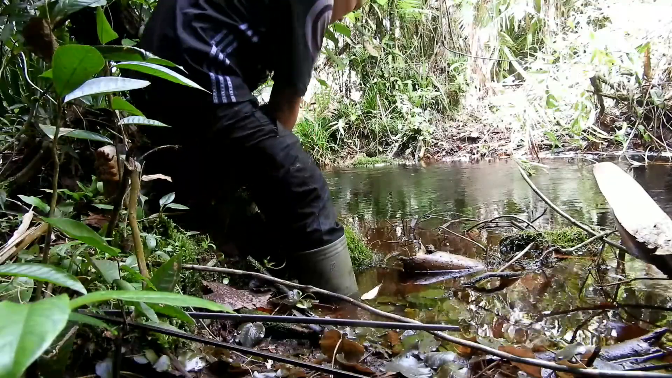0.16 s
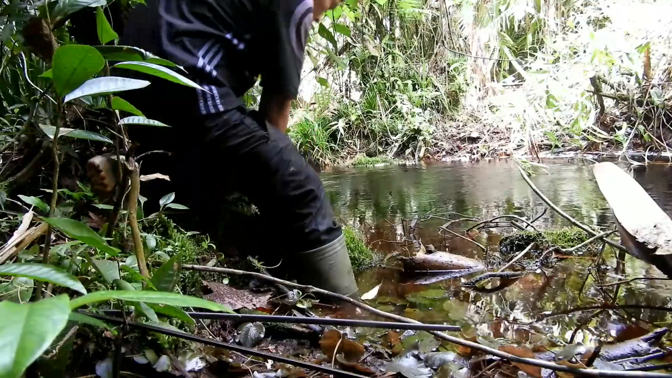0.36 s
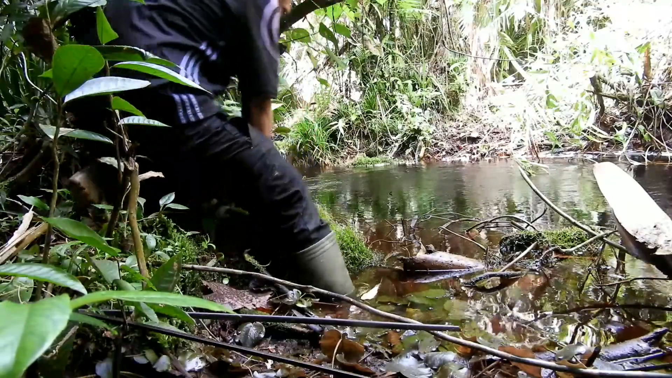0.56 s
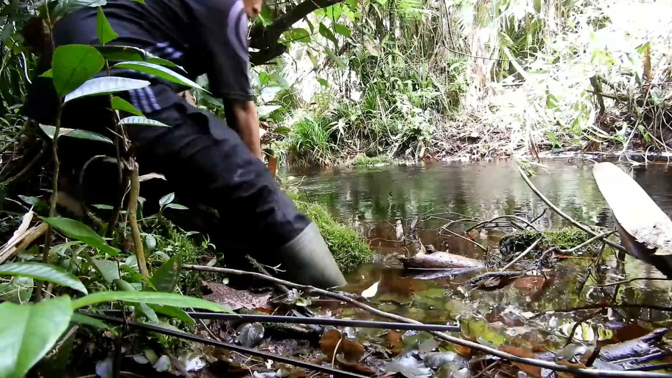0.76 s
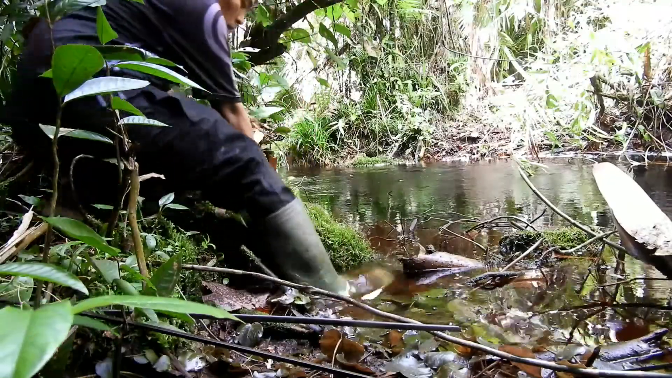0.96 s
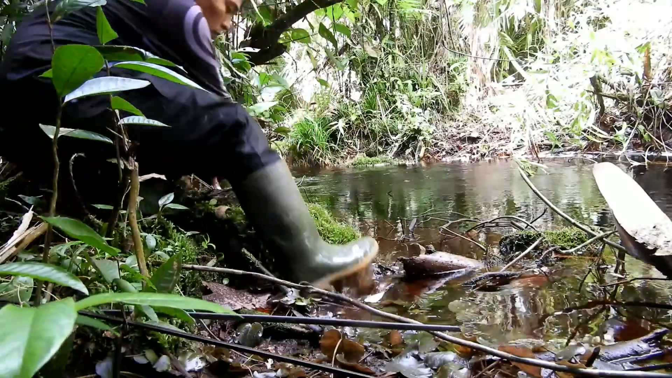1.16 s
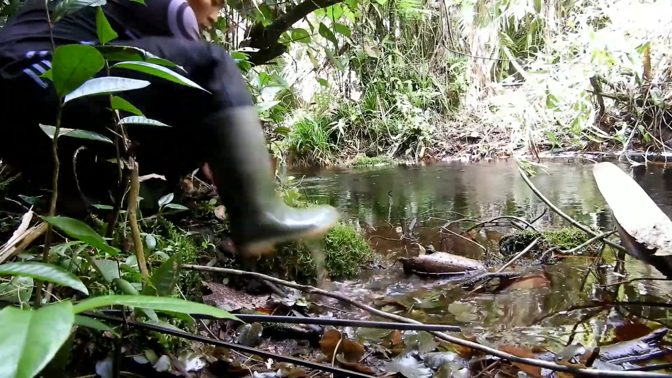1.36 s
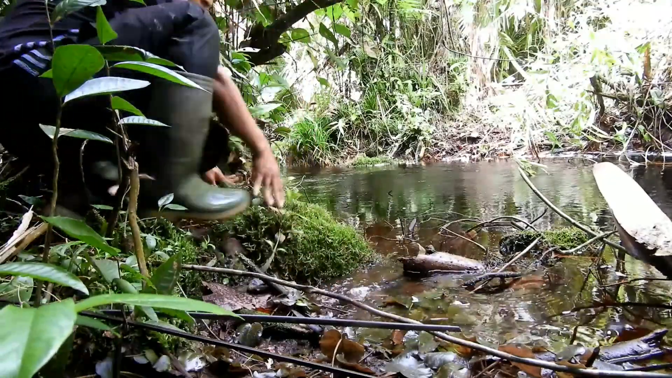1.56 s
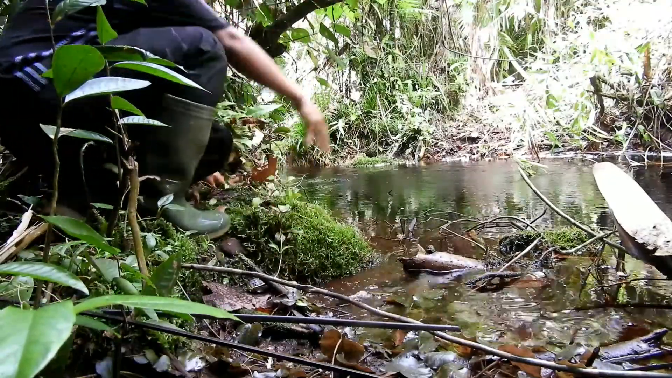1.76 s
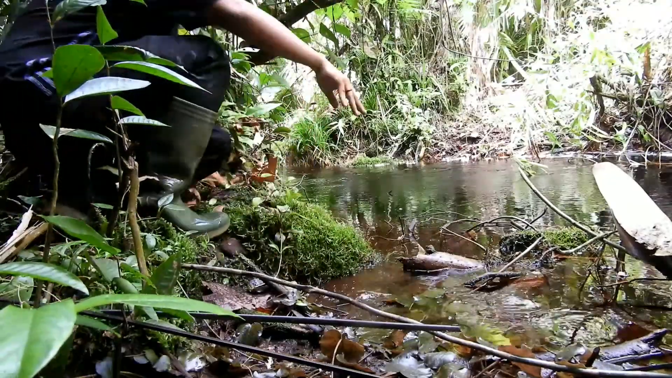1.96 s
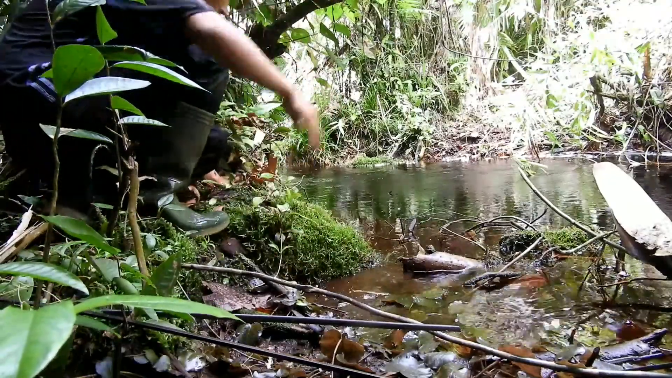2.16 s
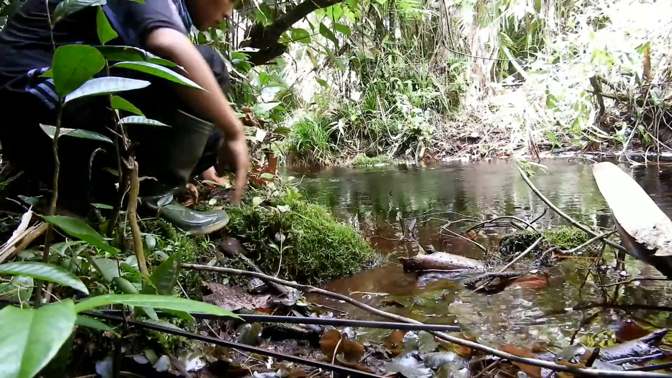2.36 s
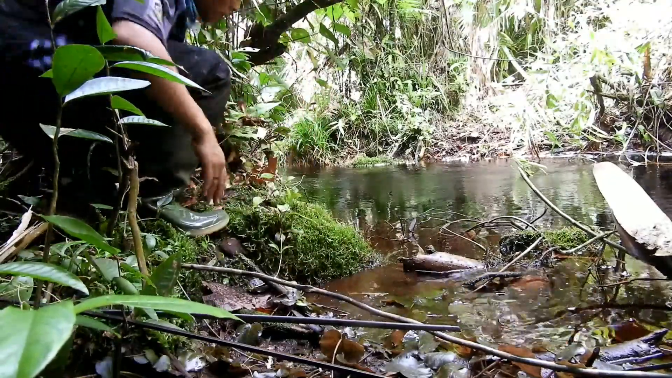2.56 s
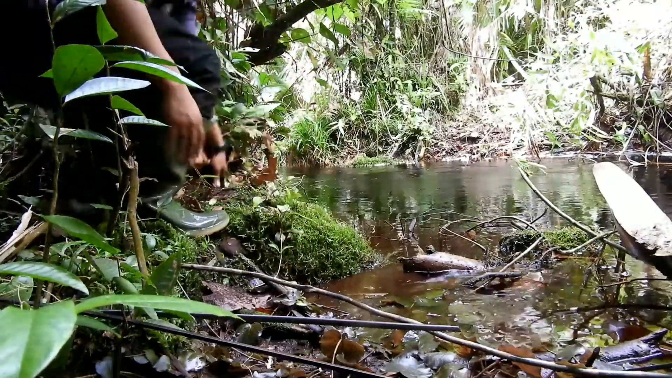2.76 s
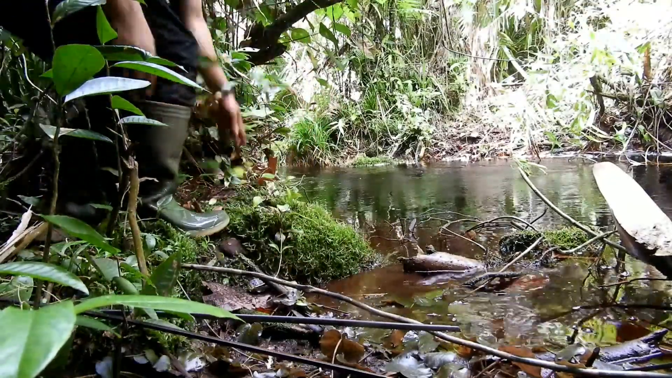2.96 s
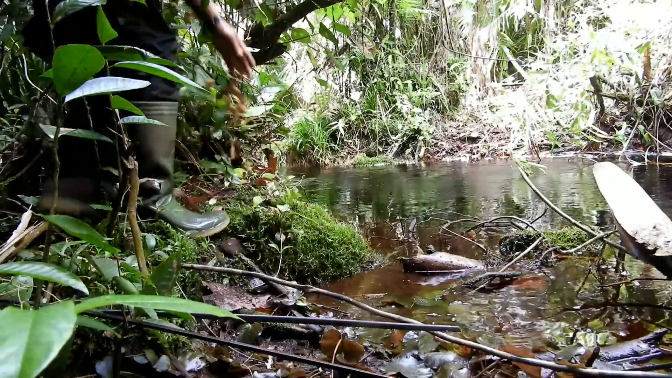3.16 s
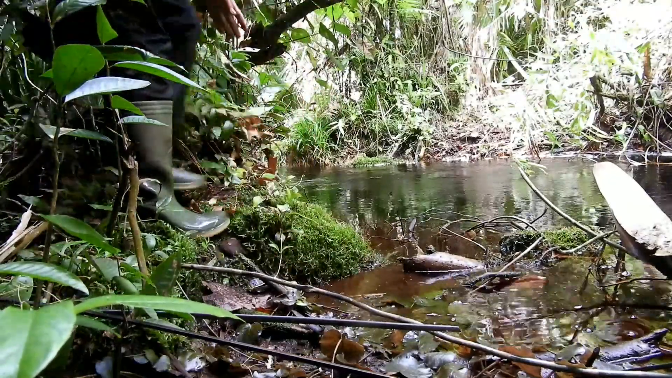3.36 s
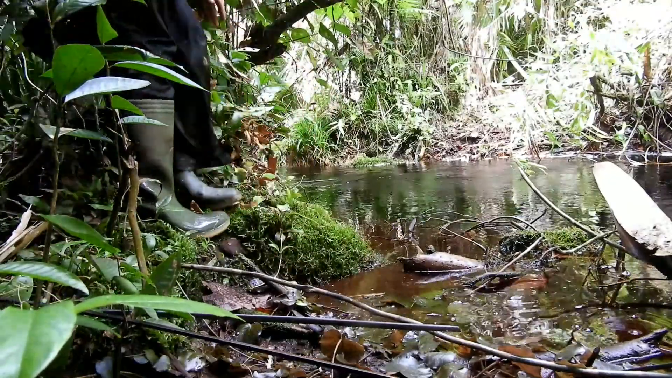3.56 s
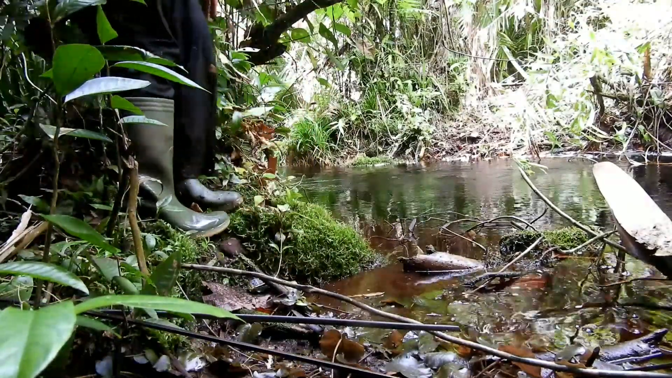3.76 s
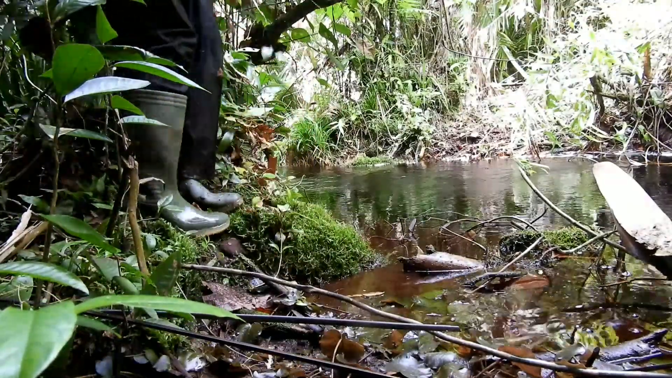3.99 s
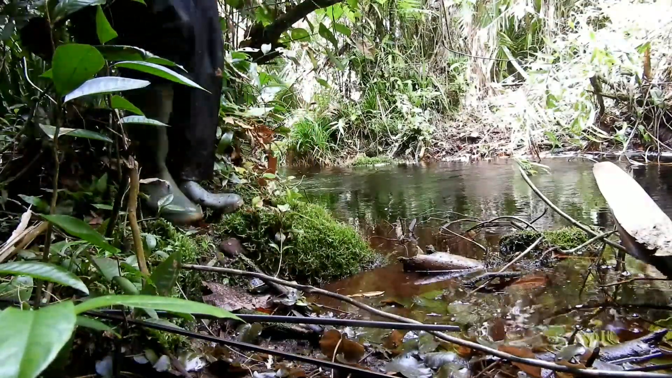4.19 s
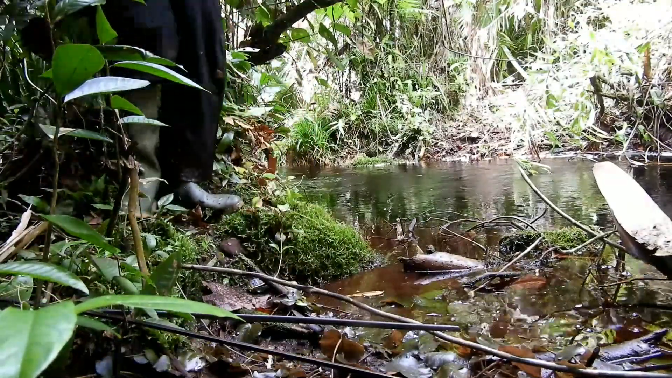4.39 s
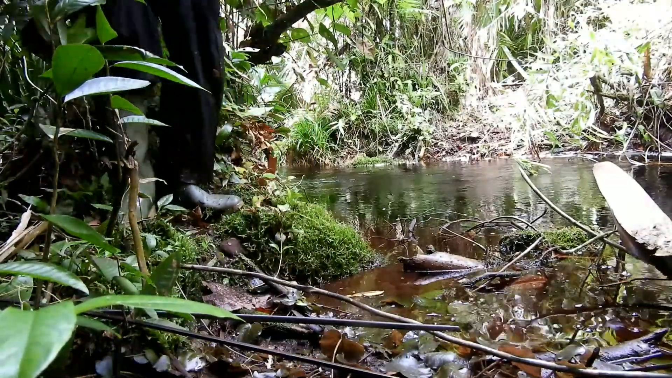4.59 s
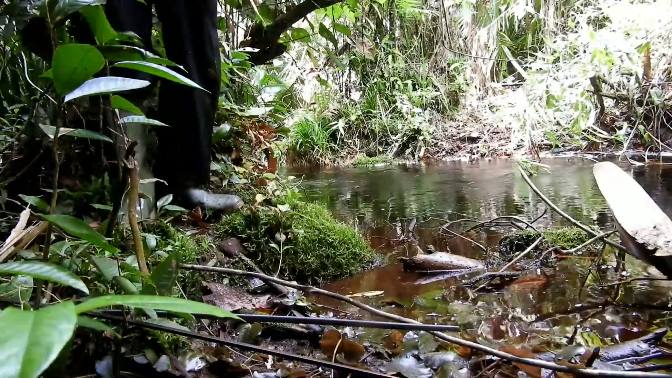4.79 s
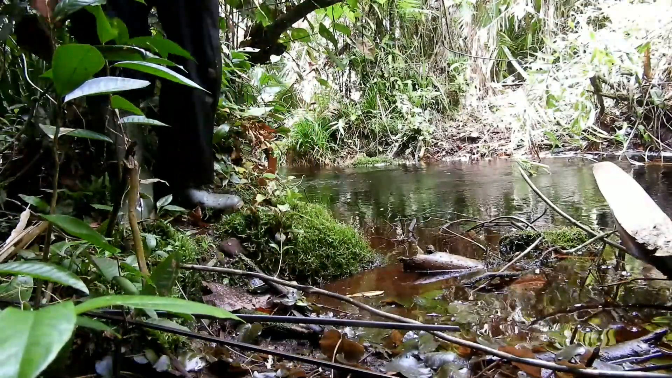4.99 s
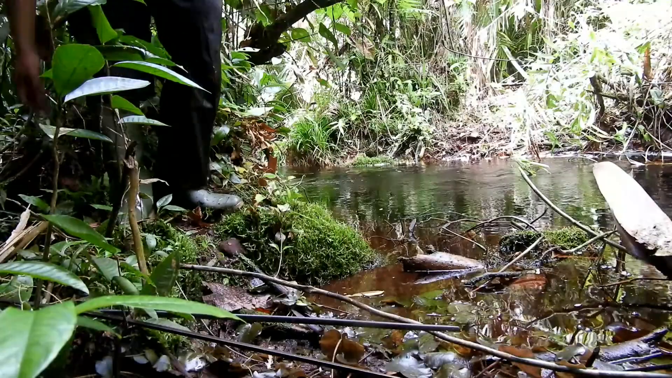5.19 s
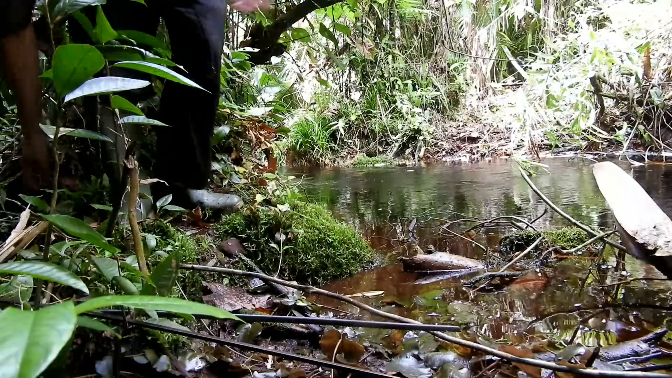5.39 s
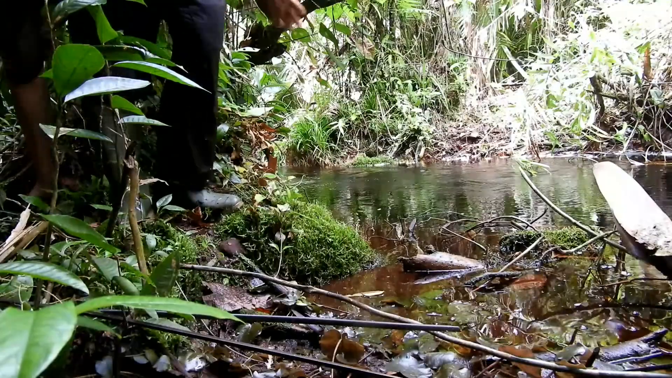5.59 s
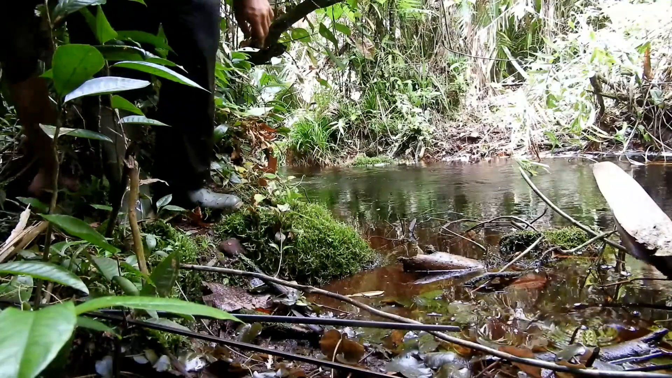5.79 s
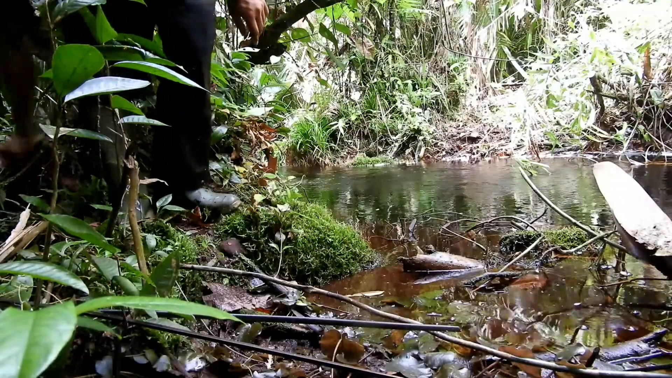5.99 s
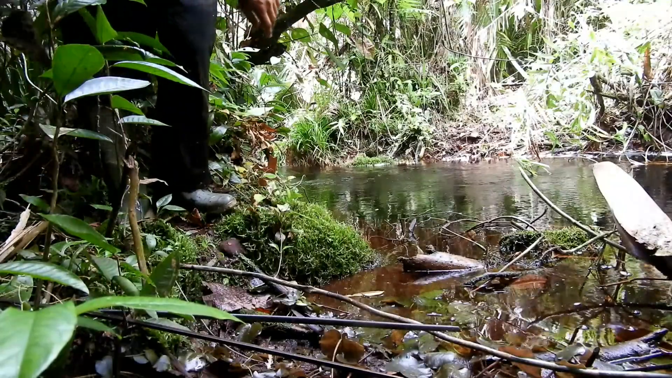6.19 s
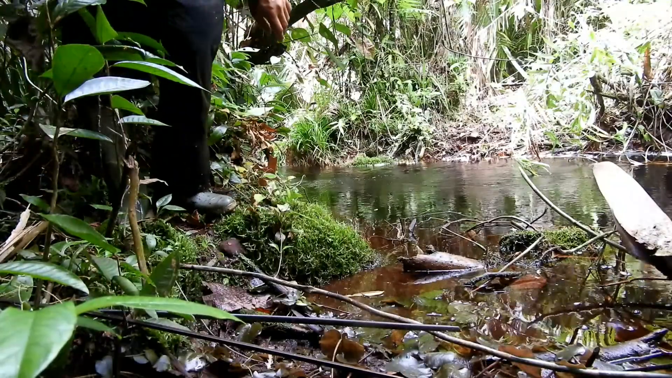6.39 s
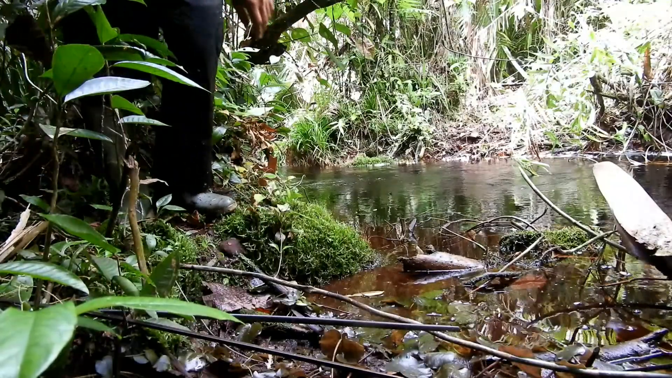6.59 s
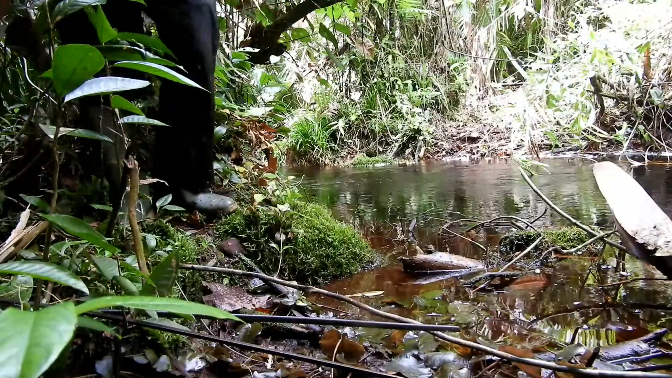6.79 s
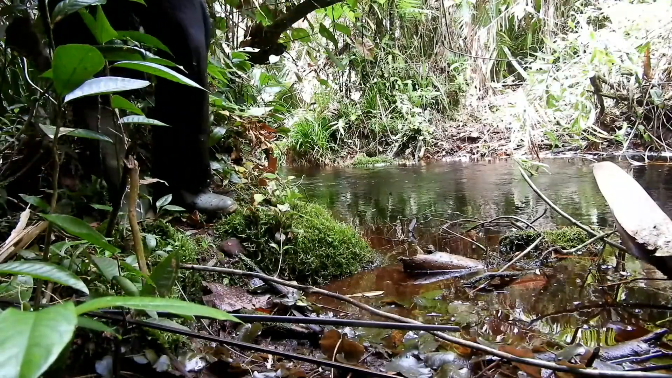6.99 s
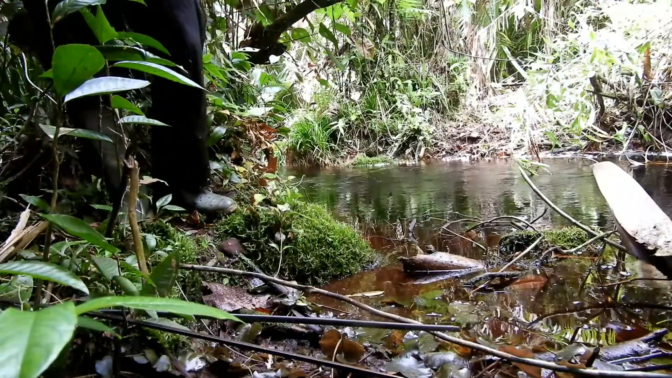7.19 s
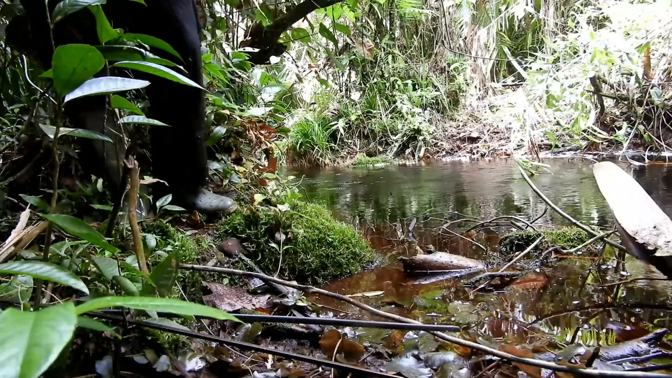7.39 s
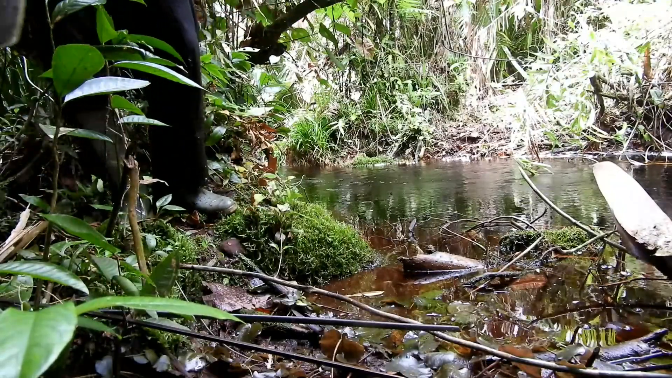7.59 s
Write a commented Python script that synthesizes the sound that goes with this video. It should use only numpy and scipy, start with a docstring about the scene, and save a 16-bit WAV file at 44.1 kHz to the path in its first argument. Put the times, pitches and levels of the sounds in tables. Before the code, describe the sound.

Close by a forest creek, leaves rustle as someone shifts, then a rubber boot breaks from muddy water with a sharp slosh, gulping bubbles and drips. Dull thuds on soft earth, twig snaps and crisp leaf brushing follow as they climb the bank. Later it calms, with one small metallic clink. Small birds chirp with echoes over soft air, creek wash and a thin insect whine. Natural stereo.

```python
"""A muddy forest creek: someone in rubber boots pulls a foot out and climbs the bank through leaves.
The water gulps and drips as air pockets ring with sliding pitch; twigs snap and dry leaves crack as noise bursts.
Soles thud as short dull notes, and something of steel, perhaps a bush knife, rings once in many tones.
Birds whistle among echoing trees, over a thin insect whine, steady air and creek wash, and a low distant hum."""
import sys
import numpy as np
from scipy import signal
from scipy.fft import rfft, irfft, next_fast_len
from scipy.io import wavfile
from scipy.ndimage import uniform_filter1d

SR = 44100
rng = np.random.default_rng(int(sys.argv[2]) if len(sys.argv) > 2 else 0)


def waveform_to_disk(signal):
    """Save audio, clipped to [-1, 1], as 16-bit WAV at the path in sys.argv[1]."""
    frames = np.transpose(np.atleast_2d(signal))
    scaled = np.clip(frames, -1, 1) * 32767
    samples = np.round(scaled).astype(np.int16)
    wavfile.write(sys.argv[1], SR, samples)


N = 337365
TIME = np.arange(N) / SR


def amp(db):
    """Turns decibels into a gain."""
    return 10 ** (np.asarray(db) / 20)


def unit(x):
    """Scales a sound to an average strength (rms) of 1."""
    return x / np.sqrt(np.mean(x ** 2) + 1e-20)


def read(points, hz):
    """Reads a curve between its points, on a logarithmic pitch axis."""
    f, value = np.transpose(points)
    return np.interp(np.log(hz + 1), np.log(f + 1), value)


def level(rows):
    """Turns a dB curve over time into a gain for every sample."""
    return amp(np.interp(TIME, *np.transpose(rows)))


def add(mix, s, sound):
    """Mixes a sound in at time s, cutting off what runs past the end."""
    part = mix[..., max(0, round(s * SR)):][..., :sound.shape[-1]]
    part += sound[..., :part.shape[-1]]


def swell(start, length, attack_s, release_s):
    """A loudness shape: a straight rise, a hold, then an exponential fade after the length."""
    rise = np.clip((TIME - start) / attack_s, 0, 1)
    fade = np.exp(-np.clip((TIME - start - length) / release_s, 0, 20))
    return rise * fade


def drift(rate_hz):
    """Random motion of rms 1, with little movement faster than rate_hz."""
    hz = np.fft.rfftfreq(N, 1 / SR)
    return unit(irfft(rfft(rng.standard_normal(N)) / (1 + (hz / rate_hz) ** 4), N))


# how alike left and right are at each pitch: f/Hz, likeness (0 = unrelated, 1 = the same)
LIKENESS = [(30, 0.57), (150, 0.79), (300, 0.57), (700, 0.46), (1500, 0.73), (3000, 0.42), (6000, 0.42),
            (9000, 0.086), (14000, 0)]


def spread(pair, spectrum):
    """Colours two unrelated signals and blends them into left and right, more alike in the bass; rms 1."""
    size = next_fast_len(N)
    hz = np.fft.rfftfreq(size, 1 / SR)
    a, b = rfft(pair, size) * amp(read(spectrum, hz))
    angle = np.arcsin(np.clip(read(LIKENESS, hz), -1, 1)) / 2
    left = a * np.cos(angle) + b * np.sin(angle)
    right = b * np.cos(angle) + a * np.sin(angle)
    return unit(irfft([left, right], size)[:, :N])


def crackle(per_s, spread_db, smooth):
    """Two trains of tiny clicks of very unequal size, over smooth friction noise."""
    extra_db = spread_db * np.minimum(rng.exponential(1, (2, N)), 4)
    size = amp(extra_db) * rng.choice([-1, 1], (2, N))
    clicks = size * (rng.random((2, N)) < per_s / SR)
    return unit(clicks) + smooth * rng.standard_normal((2, N))


def bubble(hz, t60, rise, attack_s=0.0006):
    """A ring that fades 60 dB in t60 seconds while its pitch moves by rise octaves (minus = down)."""
    t = np.arange(int(1.3 * t60 * SR) + 2) / SR
    pitch = hz * 2 ** (rise * t / t60)
    ring = np.sin(2 * np.pi * np.cumsum(pitch) / SR)
    return ring * amp(-60 * t / t60) * (1 - np.exp(-t / attack_s))


# how long echoes last among the trees, before the shorten factor: f/Hz, 60 dB fade time t/s
TREES = [(150, 0.36), (700, 0.37), (1500, 0.61), (3000, 1), (7000, 0.63), (12000, 0.7)]


def trees(x, shorten, build_s=.001):
    """Echoes scattered by trunks and leaves build up, then each band dies at its own speed."""
    t = np.arange(SR) / SR
    taps = rng.standard_normal((2, SR)) * (rng.random((2, SR)) < 3000 / SR)
    taps = taps * np.minimum(t / build_s, 1)
    hz, frame_s, z = signal.stft(taps, SR, nperseg=256)
    t60 = shorten * read(TREES, hz)[:, None]
    tail = signal.istft(z * amp(-60 * frame_s / t60), SR, nperseg=256)[1]
    tail = tail + 0.35 * tail[::-1]  # each side also gets some of the other
    return signal.fftconvolve(np.atleast_2d(x), tail / np.linalg.norm(tail[0]), axes=1)[:, :N]


def band_noise(hz, width_hz):
    """Noise in one resonance, unrelated left and right, at half strength width_hz from its centre."""
    f = np.fft.rfftfreq(N, 1 / SR)
    return unit(irfft(rfft(rng.standard_normal((2, N))) / (1 + ((f - hz) / width_hz) ** 2), N))


# air pockets closing in mud and water:
# t/s, level/dB (before gulp_db), f/Hz, pitch rise [octaves while it rings], 60 dB fade time t/s
BUBBLES = [(1.2236, -20, 3270, .1, .011), (1.2268, -17, 1330, .1, .014), (1.228, -27, 1680, -.1, .03),
           (1.228, -27, 930, .3, .02), (1.241, -29.5, 640, -.1, .06), (1.2416, -29, 2770, .3, .013),
           (1.243, -34, 1280, -.1, .06), (1.2603, -25.5, 970, 2.2, .035), (1.2668, -30, 3050, 1, .012),
           (1.281, -30.5, 600, -.1, .08), (1.285, -25, 1290, -.7, .035), (1.292, -22.5, 1120, .5, .035),
           (1.295, -27, 810, -.1, .05), (1.3013, -26, 2500, .2, .025), (1.3068, -25, 2200, .7, .015),
           (1.31, -35, 1830, .2, .1), (1.3126, -14.3, 610, 1.7, .038), (1.342, -27, 2630, 1.2, .015),
           (1.351, -33, 610, 1, .07), (1.366, -28.5, 2500, 1, .035), (1.371, -27, 1450, .5, .03),
           (1.386, -27.5, 960, .3, .045), (1.419, -25.5, 1110, .1, .03), (1.432, -32, 686, -.2, .06),
           (1.433, -34, 3700, .3, .03), (1.440, -28, 1080, 1, .03), (1.448, -32, 1420, .2, .03),
           (1.470, -33, 880, .5, .04), (1.524, -20.5, 930, 2.1, .04), (1.53, -27, 1160, .7, .03),
           (1.566, -37, 855, .6, .05)]
# gushes as the boot breaks free and drains: start t/s, length t/s, level/dB (before slosh_db)
GUSHES = [(1.218, 0.036, -37.5), (1.283, 0.035, -36), (1.337, .125, -39.5), (1.523, 0.016, -39),
          (1.542, 0.032, -48)]
# colour of the sloshing water: f/Hz, relative level/dB
WATER_COLOUR = [(250, -20), (480, -7), (600, 1.5), (750, -1.5), (900, 1), (1150, 0), (1600, -1.5),
                (2700, -0.3), (4500, -12.5), (9000, -29)]


def water(slosh_db=-5.6, gulp_db=0.3, per_s=48, count=36, ring_cycles=34, attack_s=.0032, release_share=.2):
    """The boot leaves the creek: a swarm of small ringing bubbles, splatter and a few big gulps."""
    swarm, gulps, first_s = np.zeros((2, N)), np.zeros(N), GUSHES[0][0]
    for hz in np.geomspace(520, 4200, count):
        births = rng.uniform(-1.4, 1, (2, SR)) * (rng.random((2, SR)) < per_s / SR)
        # each bubble fades 60 dB in the same number of cycles, so small, high ones die sooner
        ring = np.sqrt(hz) * bubble(hz, ring_cycles / hz, rise=0.4)
        add(swarm, first_s, signal.oaconvolve(births, ring[None], axes=1))
    splatter = crackle(per_s=370, spread_db=4.5, smooth=.15)
    slosh = spread(unit(swarm) * np.sqrt(SR / N) + .45 * splatter, WATER_COLOUR)
    slosh = slosh + 0.47 * slosh[::-1]
    slosh = slosh / np.std(slosh[:, round(first_s * SR):][:, :SR])  # even out over the first second of water
    # a longer gush takes longer to drain
    flow = sum(amp(db) * swell(s, length, attack_s, release_share * length) for s, length, db in GUSHES)
    for s, db, hz, rise, t60 in BUBBLES:
        add(gulps, s, amp(db) * bubble(hz, t60, rise))
    return amp(slosh_db) * flow * slosh + amp(gulp_db) * gulps


# drops fall while the boot drains
DRIP_FROM_S, DRIP_TO_S, DROP_LOW_HZ, DROP_HIGH_HZ = 1.235, 1.46, 1500, 6000


def droplets(drops_db=-34, spread_db=3, cycles=24, rise=.5, count=40):
    """Small drops and films of mud burst round the draining boot, each a short rising tick."""
    out = np.zeros((2, N))
    for when, pitch, size, side in rng.random((count, 4)):
        hz = DROP_LOW_HZ * (DROP_HIGH_HZ / DROP_LOW_HZ) ** pitch
        db = drops_db + spread_db * min(-np.log(1 - size), 3)  # many small, few large
        tick = amp(db) * bubble(hz, cycles / hz, rise, attack_s=.0001)
        left_right = np.sqrt([[.5 + side], [1.5 - side]])
        add(out, DRIP_FROM_S + when * (DRIP_TO_S - DRIP_FROM_S), left_right * tick)
    return out


# twigs, leaf stalks and slaps of water:
# t/s, level/dB, centre f/Hz, width to each side [octaves], 60 dB fade time t/s
SNAPS = [(0.2575, -22, 2900, 2, 0.008), (.8155, -25, 7050, 0.44, 0.0082), (1.0335, -31, 8500, 0.28, .016),
         (1.184, -31, 8000, 0.55, .008), (1.2271, -15, 1420, .65, .004), (1.2274, -17.5, 3400, .3, .007),
         (1.2325, -22, 7000, 0.44, .008), (1.2645, -30, 6500, .4, .008), (1.2848, -27, 3200, 1.2, 0.0061),
         (1.3132, -20, 6500, 0.53, .01), (1.3415, -28, 3800, 0.5, 0.0099), (1.4035, -25, 7516, 0.49, .008),
         (1.4195, -20, 6000, 1.1, 0.004), (1.4435, -18.5, 6500, .6, .008), (1.4998, -24, 5700, .4, .012),
         (1.5108, -7.7, 6600, 0.36, 0.007), (1.5133, -19, 7300, .4, .005), (1.5325, -24, 5600, 0.28, .006),
         (1.6403, -25, 8500, .3, .012), (1.864, -34, 3600, .8, .012), (2.096, -29, 2980, 1.7, 0.012),
         (2.3755, -30, 5500, 0.89, 0.011), (2.89, -28, 5900, 0.62, 0.39), (3.015, -20, 8000, .35, 0.0088),
         (3.066, -25, 8500, 0.36, .005), (3.078, -21, 8500, 0.46, .01), (3.166, -32, 3700, 0.13, .17),
         (3.2028, -18.5, 8500, 0.3, .015), (3.2745, -26, 3300, .15, 0.035), (3.2835, -25, 8000, 0.37, .025),
         (3.4505, -22, 8500, .4, .006), (3.4895, -21, 7500, .6, .006), (3.5545, -22, 8300, 0.32, .004),
         (3.641, -22, 8500, 0.28, .01), (4.6105, -33, 7000, .7, 0.008), (5.69, -39, 1500, .6, .02),
         (5.8143, -33, 950, .8, 0.016), (5.9365, -33, 7000, 0.88, .02), (6.1045, -35.5, 2000, 0.56, .012),
         (6.5036, -35, 1800, 1.1, .03), (6.5056, -33, 4400, .45, .028), (6.993, -17, 6100, 0.14, 0.0043),
         (6.9936, -19.5, 8000, 0.24, 0.0037)]


def snaps(apart=0.26):
    """Each snap is a dying noise burst in one broad resonance, a little different on each side."""
    out, t = np.zeros((2, N)), np.arange(4096) / SR
    for s, db, hz, octaves, t60 in SNAPS:
        dying = amp(-60 * t / t60)
        edges = np.clip([hz / 2 ** octaves, hz * 2 ** octaves], 100, 10200)
        band = signal.butter(4, edges, "band", fs=SR, output="sos")
        common, side = (unit(signal.sosfilt(band, dying * rng.standard_normal(len(t)))) for _ in range(2))
        pair = np.array([common + apart * side, common - apart * side])
        add(out, s, amp(db) * np.std(dying) / 2 * pair)
    return out


# dry leaves crushed in a quick run of cracks: start t/s, length t/s, level/dB
CRUNCHES = [(.26, .025, -44), (2.092, .008, -44), (3.199, .01, -36), (3.2585, .004, -34.5),
            (3.267, .012, -33.5), (3.284, .02, -44), (5.923, .012, -46.5)]
# colour of the dry leaves: f/Hz, relative level/dB
DRY_LEAF = [(500, -20), (900, -9), (1300, 1), (1800, -3), (2500, 0), (3500, 2), (4100, -3), (5000, -1),
            (7000, -5), (9300, -4), (12000, -24)]


def crunches(attack_s=.002, release_s=.004):
    """A dry leaf gives way in many small, unequal cracks."""
    press = sum(amp(db) * swell(s, length, attack_s, release_s) for s, length, db in CRUNCHES)
    return press * spread(crackle(per_s=1800, spread_db=2.5, smooth=.45), DRY_LEAF)


# soles landing on the soft bank: t/s, level/dB, f/Hz, 60 dB fade time t/s
THUDS = [(1.485, -32.5, 179, 0.041), (1.742, -41, 373, 0.091), (1.780, -34, 184, 0.057),
         (1.782, -27, 383, 0.028), (1.832, -36.5, 406, 0.043), (1.892, -38.5, 191, 0.1),
         (2.015, -37, 178, 0.11), (3.648, -39.5, 209, 0.061), (3.682, -43.5, 110, 0.07),
         (3.684, -40, 430, .04), (4.273, -36.5, 527, 0.035), (4.485, -44.5, 205, .12)]


def thuds():
    """Soft earth and hollow rubber give dull, short notes that sink slightly in pitch."""
    out = np.zeros(N)
    for s, db, hz, t60 in THUDS:
        add(out, s, amp(db) * bubble(hz, t60, rise=-0.16, attack_s=0.0015))
    return out


# weight settling on one foot: start t/s, length t/s, level/dB (before tread_db)
STEPS = [(1.045, 0.48, -59), (1.678, .14, -52), (1.985, 0.3, -63), (3.58, 0.17, -51.5), (3.98, 0.11, -56),
         (4.423, 0.22, -57), (4.8, 0.34, -57.5), (5.42, 0.24, -56.5)]
# rumble of the soft bank: f/Hz, relative level/dB
EARTH = [(30, -26), (60, 1), (90, 1.5), (200, -10), (380, -9), (600, -9.5), (1200, -34)]


def tread(tread_db=-2, attack_s=0.063, release_s=0.055):
    """Soft earth rumbles faintly under the boots at each step."""
    weight = sum(amp(db) * swell(s, length, attack_s, release_s) for s, length, db in STEPS)
    return amp(tread_db) * weight * spread(rng.standard_normal((2, N)), EARTH)


# the tones of the steel blade: f/Hz, level/dB, 60 dB fade time t/s
BLADE_TONES = [(810, -33.5, .05), (2045, -38, .07), (3300, -39, .06), (3560, -34, .07), (3455, -53, .5),
               (4285, -51.5, .9), (5150, -53, 1.0), (5572, -49, 1.1), (6035, -47.5, 1.25),
               (6428, -54.5, .9), (7052, -53, .8), (7730, -55, .9), (8570, -49.5, 1.0), (9022, -52, .5)]


def blade(knock_s=6.504, flicker=.6, flicker_hz=20):
    """One knock rings the steel; the high tones last, each fading in and out unevenly as the blade moves."""
    out, t = np.zeros((2, N)), np.arange(SR) / SR
    slow = 1 / (1 + (np.fft.rfftfreq(SR, 1 / SR) / flicker_hz) ** 4)
    for hz, db, t60 in BLADE_TONES:
        phase = 2 * np.pi * hz * t + rng.normal(0, .5, (2, 1))
        a, b = flicker * unit(irfft(rfft(rng.standard_normal((2, 2, SR))) * slow, SR))
        ring = ((1 + a) * np.sin(phase) + b * np.cos(phase)) / np.sqrt(1 + 2 * flicker ** 2)
        add(out, knock_s, amp(db - 60 * t / t60) * ring)
    return out


# how hard the body moves through the undergrowth: t/s, level/dB (before tips_db and scrape_db)
EFFORT = [(0, -56), (.35, -48.5), (.6, -50.5), (.75, -47), (1.42, -46), (1.95, -53.5), (2.52, -61),
          (2.78, -49), (3.5, -50), (3.85, -55.5), (4.22, -50), (4.58, -53), (5.4, -62), (5.65, -58),
          (6.1, -62.5), (7.65, -63)]
# single plants sweeping along a leg or an arm (levels before tips_db and scrape_db):
# start t/s, length t/s, crisp leaf tips level/dB, duller scraping level/dB
BRUSHES = [(0.047, .02, -50, -58), (0.14, .02, -47, -56), (.247, .02, -40, -50.5), (0.375, 0.061, -52, -56),
           (1.027, 0.037, -47, -52), (1.2, .24, -53, -50.5), (1.484, .065, -43.5, -45),
           (1.634, 0.023, -49, -51), (1.72, .04, -56, -49), (1.78, 0.025, -50, -53.5),
           (1.875, .02, -49, -58), (2.562, 0.022, -54, -57), (2.835, 0.1, -43, -51),
           (2.91, 0.3, -42.5, -53), (3.24, 0.052, -38.5, -53), (3.31, 0.24, -45.5, -58),
           (3.585, 0.095, -41, -49.5), (3.69, .045, -51, -55), (3.945, 0.02, -50, -65),
           (4.23, 0.028, -49, -52), (4.706, 0.021, -47.5, -62), (5.011, 0.032, -53, -55.5),
           (5.855, .02, -53, -59), (6.491, 0.084, -54, -54), (7.335, .025, -54, -64)]
# colours of the leaf tips and of the scraping: f/Hz, relative level/dB
LEAF_TIPS = [(2500, -33.5), (4500, -11.5), (6500, -5.5), (8000, -1.7), (8800, -.3), (9450, .7),
             (9900, -4.2), (10500, -8.5), (12000, -16.5), (15000, -33)]
SCRAPE = [(80, -20), (200, -12), (370, -3.5), (700, -7), (1000, -4), (1300, -1), (2400, -1), (3600, 1),
          (4300, -0.5), (5200, -3), (6500, -1), (9000, -18), (13000, -44)]
# a stem bends, then springs free; a long sweep takes this share of its length more to build up
BRUSH_ATTACK_S, BRUSH_RELEASE_S, BRUSH_BEND_SHARE = 0.008, 0.025, .33
# scraping grows more slowly with effort than the tips do; before the final gains both are equal at EVEN_DB
SCRAPE_GROWTH, EVEN_DB = 0.78, -58.5


def rustle(tips_db=5.1, scrape_db=4, clump_db=1.4, clump_hz=60):
    """Leaves flick past the legs in clumps of small clicks, following the effort and swelling at each brush."""
    tips_power = level(EFFORT) ** 2
    scrape_power = amp(EVEN_DB) ** 2 * (tips_power / amp(EVEN_DB) ** 2) ** SCRAPE_GROWTH
    for start, length, crisp_db, dull_db in BRUSHES:
        shape = swell(start, length, BRUSH_ATTACK_S + BRUSH_BEND_SHARE * length, BRUSH_RELEASE_S)
        tips_power = tips_power + (amp(crisp_db) * shape) ** 2
        scrape_power = scrape_power + (amp(dull_db) * shape) ** 2
    clumps = amp(clump_db * drift(clump_hz))
    tips = spread(crackle(per_s=1500, spread_db=3.5, smooth=0.8), LEAF_TIPS) * np.sqrt(tips_power)
    scrape = spread(crackle(per_s=900, spread_db=3.0, smooth=1.0), SCRAPE) * np.sqrt(scrape_power)
    return clumps * (amp(tips_db) * tips + amp(scrape_db) * scrape)


def whistle(pitch, waver):
    """A near-pure bird tone along a pitch curve, trembling a little, with soft ends."""
    tremble = unit(uniform_filter1d(rng.standard_normal(SR // 2), 60))[:len(pitch)]
    tone = np.sin(2 * np.pi * np.cumsum(pitch * (1 + waver * tremble)) / SR)
    return tone * signal.windows.tukey(len(pitch), .4)


# a small bird's thin slurs, mostly upward (levels before the direct and echo gains):
# t/s, length t/s, start f/Hz, end f/Hz, level/dB
TSITS = [(.333, 0.025, 7520, 7620, -37), (.56, 0.028, 6400, 6350, -39), (.60, 0.056, 6600, 6700, -40),
         (.85, 0.15, 7000, 7200, -49), (1.265, 0.03, 7450, 7700, -35.5), (1.565, 0.037, 6380, 6920, -40),
         (1.825, 0.041, 6820, 7250, -42), (1.94, 0.03, 6940, 6950, -37.5), (2.24, 0.071, 7570, 7430, -44),
         (2.52, 0.043, 7600, 8060, -45.5), (4.79, .06, 7460, 8200, -45.5), (5.30, 0.065, 6300, 7250, -49),
         (5.48, 0.062, 6430, 6570, -48.5), (5.605, 0.048, 6420, 7860, -39.5),
         (5.77, 0.031, 6080, 6240, -40), (5.795, 0.044, 6500, 7760, -37.5),
         (6.025, 0.05, 6430, 7090, -41.5), (6.075, 0.032, 7000, 7260, -36.5),
         (6.09, 0.052, 7050, 6400, -40.5), (6.355, 0.026, 6600, 7330, -39), (6.478, 0.039, 6560, 7110, -36),
         (6.63, 0.054, 6670, 7160, -43), (6.85, 0.053, 6300, 7700, -44), (6.89, 0.041, 7550, 8330, -40.5)]
# hoarse far whistles, same columns: t/s, length t/s, start f/Hz, end f/Hz, level/dB
WHISTLES = [(.15, .02, 1560, 1380, -42), (.912, 0.07, 2750, 2200, -46), (2.04, 0.027, 2580, 2470, -43),
            (6.703, 0.053, 2484, 2395, -40), (6.715, 0.0463, 2306, 1900, -42.5),
            (6.994, 0.085, 1480, 1600, -43.5)]


def slurs(rows, waver, direct_db, echo_db, shorten):
    """Bird notes that glide quickly and settle on their last pitch, with echoes from the trees."""
    out = np.zeros(N)
    for s, length, start_hz, end_hz, db in rows:
        u = np.linspace(0, 1, int(length * SR))
        pitch = end_hz + (start_hz - end_hz) * (1 - u) ** 2
        add(out, s, amp(db) * whistle(pitch, waver))
    return amp(direct_db) * out + amp(echo_db) * trees(out, shorten)


# a bird calling in pairs, each call a raspy high note and a short low one
# (levels before the direct and echo gains): t/s, length t/s, high note f/Hz, its level/dB, low note level/dB
CHIPS = [(1.470, 0.042, 3100, -38.5, -43), (1.679, 0.049, 3120, -39, -46), (2.04, 0.045, 3110, -40, -38),
         (2.259, .047, 3120, -40, -40), (7.245, 0.05, 3040, -41.5, -37), (7.457, 0.049, 3050, -42.5, -38)]
LOW_NOTE_AT = .74  # share of the high note after which the low one begins


def chips(rasp=0.018, onset_rasp=.065, settle_s=.012, scoop=.07, rasp_hz=150,
          low_from_hz=1620, low_to_hz=1150, low_s=0.034,
          direct_db=-4, low_direct_db=-5.5, echo_db=-0.9, low_echo_db=-2):
    """The high note starts harsh, scoops up and flutters as it settles; the low note just falls."""
    high, low = np.zeros((2, N))
    fall = np.linspace(low_from_hz, low_to_hz, int(low_s * SR))
    for s, length, hz, db, low_db in CHIPS:
        t = np.arange(int(length * SR)) / SR
        unsettled = np.exp(-t / settle_s)
        flutter = np.sin(2 * np.pi * (rasp_hz * t + rng.random()))
        pitch = hz * (1 - scoop * unsettled + (rasp + onset_rasp * unsettled) * flutter)
        add(high, s, amp(db) * (1 + .3 * flutter) * whistle(pitch, waver=0.02))
        low_gain = amp(low_db + np.linspace(0, -4, len(fall)))
        add(low, s + LOW_NOTE_AT * length, low_gain * whistle(fall, waver=0.024))
    echo = trees(high + amp(low_echo_db) * low, shorten=1.1)  # low_echo_db comes on top of echo_db
    return amp(direct_db) * high + amp(low_direct_db) * low + amp(echo_db) * echo


# sharp downward calls, given in pairs: t/s, level/dB (before the throat, direct and echo gains)
SWOOPS = [(.198, -36), (.415, -36), (4.124, -37), (4.334, -35)]
# how strongly the throat passes each pitch of the fall: f/Hz, level/dB
SWOOP_THROAT = [(950, -12), (1150, -7), (1480, 0), (1950, -8), (2600, 2), (3350, 6.5), (3700, -4)]


def swoops(from_hz=3700, toward_hz=800, fall_s=.0125, length_s=0.046, echo_from_hz=1550,
           direct_db=-6, echo_db=1.7, waver=.04):
    """The pitch plunges at once, slows, and dies away near the bottom."""
    out, t = np.zeros(N), np.arange(int(length_s * SR)) / SR
    pitch = toward_hz + (from_hz - toward_hz) / (1 + (t / fall_s) ** 2)
    throat = amp(read(SWOOP_THROAT, pitch))
    for s, db in SWOOPS:
        add(out, s, amp(db) * throat * whistle(pitch, waver))
    # the leaves scatter mostly the top of the fall
    scattered = signal.lfilter(*signal.butter(2, echo_from_hz, "high", fs=SR), out)
    return amp(direct_db) * out + amp(echo_db) * trees(scattered, shorten=0.8, build_s=.005)


# a nearer bird's clear pip: t/s, length t/s, level/dB
PIPS = [(0, .022, -45.5), (3.723, 0.042, -37.5)]
# its echoes from the trees across the creek: delay t/s, level/dB against the pip
PIP_ECHOES = [(.04, -11), (.12, -18), (.172, -15), (.195, -17)]


def pips(pitch_hz=2767, echo_db=-11.5):
    """A short level tone, thrown back a few times and faintly scattered."""
    out = np.zeros(N)
    for s, length, db in PIPS:
        note = amp(db) * whistle(np.full(int(length * SR), pitch_hz), waver=0.0075)
        add(out, s, note)
        for delay, loss_db in PIP_ECHOES:
            add(out, s + delay, amp(loss_db) * note)
    return out + amp(echo_db) * trees(out, shorten=1.1)


# insects; an end after the scene means no fade-out: start t/s, end t/s, f/Hz, width f/Hz, level/dB
INSECTS = [(1.6, 3.2, 6200, 90, -58), (1.9, 3.0, 6740, 89.5, -60), (3.5, 8, 6410, 170, -58),
           (4.6, 8, 7970, 150, -61.5), (5.1, 8, 8340, 170, -59)]


def insects(fade_s=0.22):
    """Thin wavering whines: narrow bands of noise that fade in and out."""
    out = np.zeros((2, N))
    for start, end, hz, width, db in INSECTS:
        fade = np.clip(np.minimum(TIME - start, end - TIME) / fade_s, 0, 1)
        out += amp(db) * fade * band_noise(hz, width)
    return out


# colour of the forest air and creek wash: f/Hz, relative level/dB
FOREST = [(20, -35), (35, -28), (50, -18), (70, -5), (110, -4.5), (180, -1), (270, -5.5), (520, -8),
          (1500, -11), (3100, -13.5), (4500, -14), (8300, -12), (11200, -17.5), (15000, -35)]


def forest(air_db=-49.5, hum_db=-60, hum_hz=178):
    """Steady air and creek wash, as coloured noise, with a low distant hum, as a narrow noise band."""
    air = amp(air_db + 0.45 * drift(2.7)) * spread(rng.standard_normal((2, N)), FOREST)
    hum = band_noise(hum_hz, width_hz=37.0)
    return air + amp(hum_db) * unit(hum + 0.36 * hum[::-1])


def scene():
    """Near sounds are almost dry; most birds arrive with strong echoes."""
    near = water() + droplets() + snaps() + crunches() + thuds() + blade()
    walker = near + amp(-6.5) * trees(near, shorten=0.33) + rustle() + tread()
    high_birds = slurs(TSITS, waver=0.013, direct_db=-7.2, echo_db=-0.5, shorten=1.0)
    far_birds = slurs(WHISTLES, waver=0.028, direct_db=-7, echo_db=-2.8, shorten=1.0)
    low_birds = far_birds + chips() + swoops() + pips()
    return walker + high_birds + low_birds + insects() + forest()


def record(dry, tilt_db=0.4, dip_hz=3980, dip_q=9, dip_depth=0.3, edge_hz=15200):
    """Turns left down and right up by tilt_db, makes a shallow dip at dip_hz and cuts the top treble."""
    notched = signal.lfilter(*signal.iirnotch(dip_hz, dip_q, fs=SR), dry)
    coloured = (dry + dip_depth * (notched - dry)) * amp([[-tilt_db], [tilt_db]])
    low_pass = signal.firwin(511, edge_hz, window=("kaiser", 9), fs=SR)
    return signal.oaconvolve(coloured, low_pass[None], "same")


dry = scene()
out = record(dry)
waveform_to_disk(out)
```